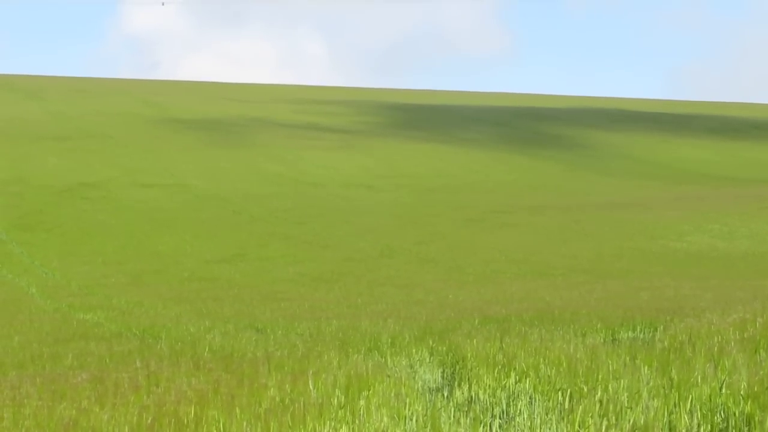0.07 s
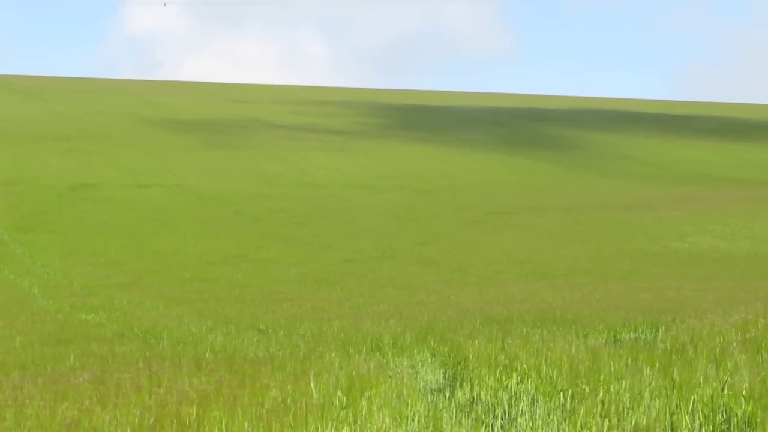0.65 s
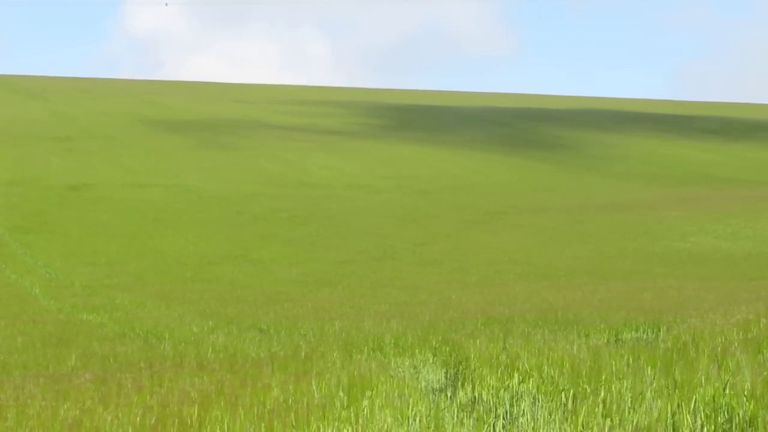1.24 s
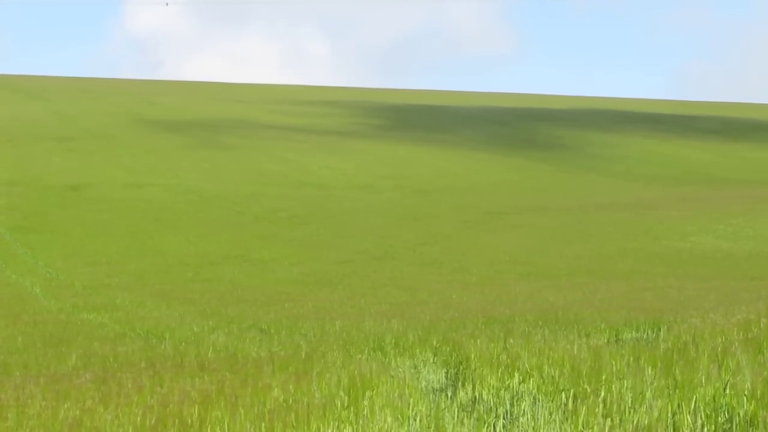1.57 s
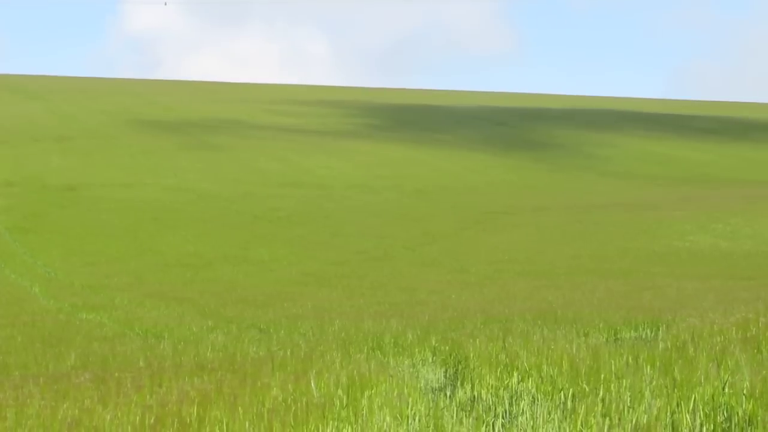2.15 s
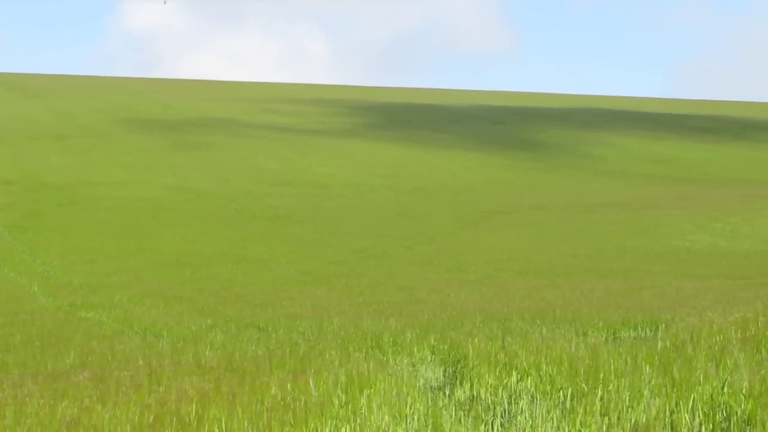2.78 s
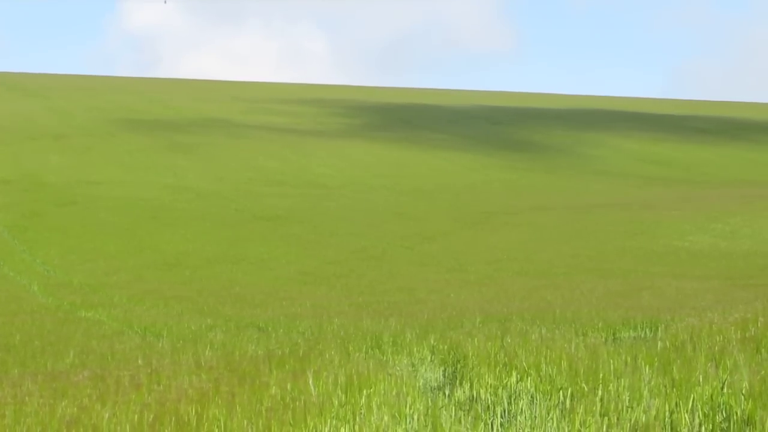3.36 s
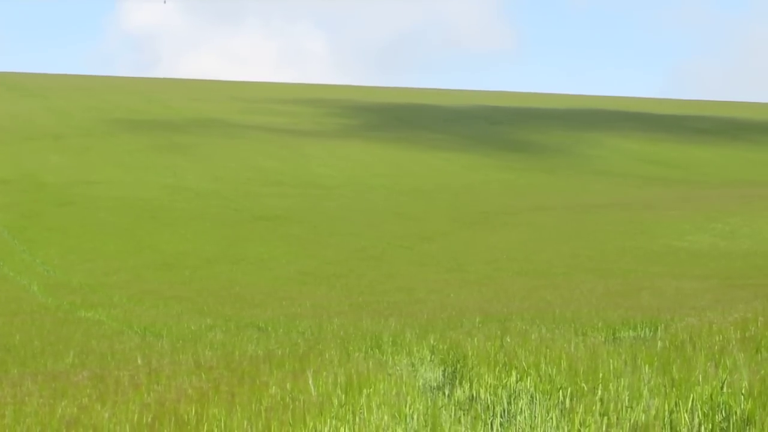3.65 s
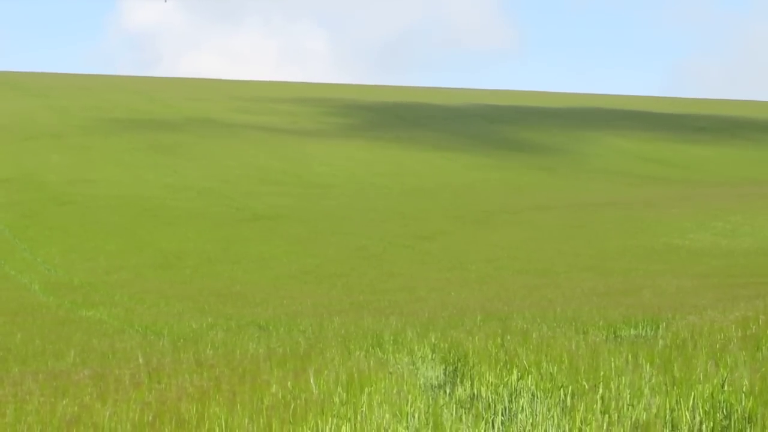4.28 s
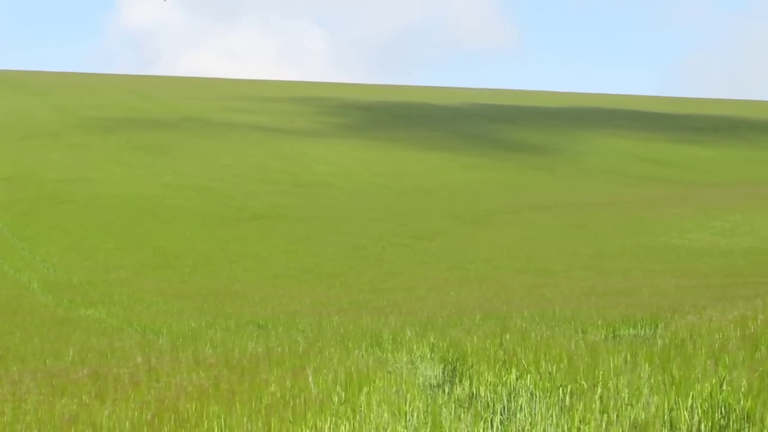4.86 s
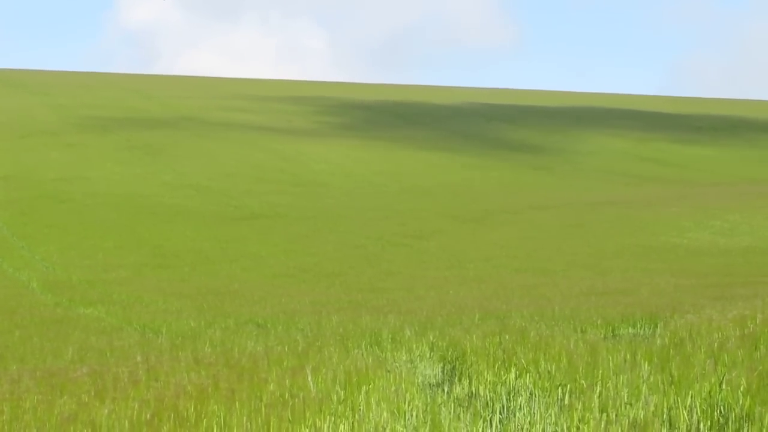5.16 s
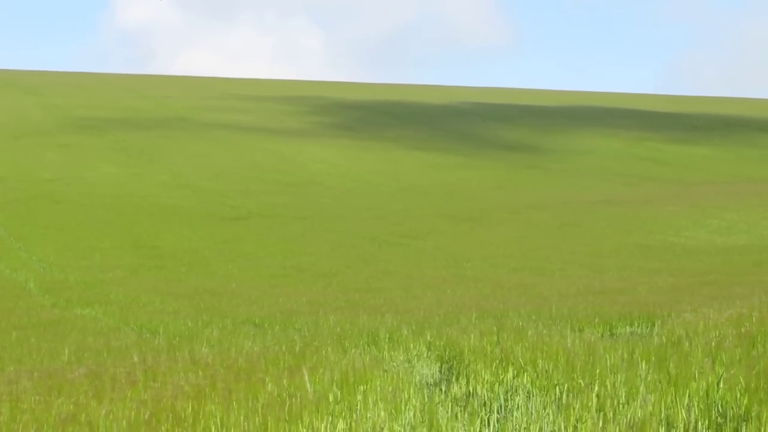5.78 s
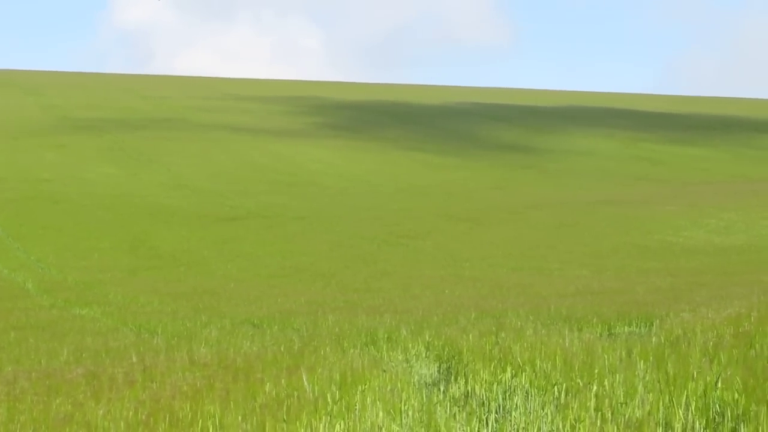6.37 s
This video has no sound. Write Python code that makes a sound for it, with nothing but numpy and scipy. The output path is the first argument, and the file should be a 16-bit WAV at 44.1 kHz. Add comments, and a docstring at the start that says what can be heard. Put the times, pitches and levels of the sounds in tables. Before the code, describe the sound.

Small birds twitter across a field under low wind buffeting that builds toward the end, with one sharp tap on the camera.

```python
"""Gusty wind buffets the two ports (openings) of a microphone, harder towards the end.
Its swirls of air make a low rumble, a ragged spatter and a few sharp slaps. Small birds, near and
far, chirp, twitter and trill in an open field: each note is a whistle with a moving pitch.
Something taps the camera body once and it rings briefly. In the background, puffs of wind rustle
the grass over a soft wash of open air and far traffic."""
import sys
import numpy as np
from scipy import signal
from scipy.fft import rfft, irfft
from scipy.io import wavfile
from scipy.ndimage import uniform_filter1d

SR = 44100
rng = np.random.default_rng(int(sys.argv[2]) if len(sys.argv) > 2 else 0)


def unload_audio(sound):
    """Save the sound as a 16-bit wav file, at the path given as the first command line argument."""
    columns = np.transpose(np.atleast_2d(sound))
    # keep every value between -1 and 1, then stretch to whole-number steps
    steps = np.round(np.clip(columns, -1, 1) * 32767)
    wavfile.write(sys.argv[1], SR, steps.astype(np.int16))


N = 287532
TIME, FREQS = np.arange(N) / SR, np.fft.rfftfreq(N, 1 / SR)

# Levels in the tables are relative: the functions turn them up or down further.
# How strong the wind is at each port. Each row: time in seconds, left in dB, right in dB.
WIND_STRENGTH = [(0, -45.5, -43), (.2, -33, -39.5), (.45, -33, -49), (.57, -48, -53), (.72, -28, -34),
                 (1.38, -24.5, -36), (1.47, -44.5, -47), (1.87, -49, -48), (1.98, -36, -34.5),
                 (2.3, -45, -40), (2.62, -39, -31), (3.1, -40, -31), (3.45, -33, -31), (3.7, -33, -29.5),
                 (4.25, -25, -21), (4.5, -31, -36), (4.69, -19.5, -29), (5.07, -15, -24.5),
                 (5.52, -18, -14.5), (5.82, -17, -27.5), (6.37, -15.5, -29), (6.52, -23, -38)]
# Short gusts (+) and lulls (-) on top of that.
# Each row: peak time in seconds, half width in seconds, left change in dB, right change in dB.
GUSTS = [(.804, .048, 10.5, 8), (3.533, .015, 6, 0), (3.775, .038, 7, 15), (3.884, .027, 10, 0),
         (4.0, .025, -3, -4), (4.24, .033, 6, 4), (4.337, .02, -6.5, -9), (4.562, .033, -2.5, 17.5),
         (5.013, .039, -8, -4.5), (5.167, .023, -4, 12), (5.235, .029, 4.5, -3), (5.382, .019, -10, 5),
         (5.496, .042, 2.5, 3), (5.71, .035, 3.5, 3), (5.982, .015, -7.5, 1), (6.293, .027, -6.5, -2),
         (6.4, .018, 0, 6)]
# The tone of the wind's layers. Each row: frequency in Hz, level in dB.
FIRM_RUMBLE_TONE = [(8, -18), (25, -6), (45, -3.5), (70, 0), (105, -2), (140, -7), (185, -21), (400, -59),
                    (2000, -130)]  # big swirls in a firm gust
LIGHT_RUMBLE_TONE = [(8, -13.5), (25, 2.5), (45, 1.5), (70, -0.5), (105, -13), (160, -25.5), (300, -54),
                     (2000, -130)]  # big swirls in light air
BUFFET_TONE = [(70, -24.5), (110, 0), (150, -1), (210, -3), (300, -12.5), (420, -27.5), (600, -40),
               (1000, -71), (6000, -125)]  # smaller, quicker swirls
SPATTER_TONE = [(150, -18), (330, 7), (480, 1.5), (700, -11), (1000, -19), (1500, -34.5), (2500, -40.5),
                (9000, -96)]  # the rough edge of hard gusts
# The hardest swirls at the left port. Each row: time in seconds, peak in dB, width in seconds.
SLAPS = [(0.762, -9, 0.0025), (0.793, -7, 0.0018), (4.698, -14, 0.00074), (4.887, -15.5, 0.00082),
         (4.935, -7, .0017), (5.217, -6.5, 0.00065), (5.239, -13.5, 0.00052), (5.303, -13, 0.00077),
         (5.437, -16, 0.00073), (5.482, -9, 0.00074), (5.505, -17, .001), (5.552, -16, 0.00075),
         (5.681, -9, 0.00078), (5.703, -3.5, .0011), (5.77, -14, 0.00098), (5.8379, -6, 0.00052),
         (6.018, -10.5, 0.0007), (6.188, -12.5, 0.00093), (6.347, -15, 0.00083)]

# A ground bird's upward flicks. Each row: start in seconds, level in dB.
FLICKS = [(0.1686, -43), (0.367, -41), (0.4788, -43.5), (0.7321, -61), (0.9618, -53.5), (1.1234, -53),
          (1.8438, -61), (2.2379, -60), (3.1909, -59), (3.3605, -60), (4.3259, -59), (4.4966, -59)]
# The nearest bird's hoarse calls. Each row: start in seconds, level in dB, pitch in Hz.
CHIRPS = [(0.4962, -40, 5300), (0.9134, -37, 5460), (1.3339, -38, 5480), (1.816, -48.5, 5250),
          (2.7695, -35, 5600), (3.599, -47, 5300), (5.8793, -38, 5250)]
# Notes that rise and fall. Each row: delay in seconds, length in seconds, level change in dB,
# then the pitch at the start, middle and end as a multiple of the call's pitch.
CHIRP_NOTES = [(0, .0063, 0, .89, 1.04, 1.01), (.012, .0135, -2.5, .87, .99, .95)]  # the two notes of a chirp
SEESAW_LAST_NOTE = [(.003, .028, 3, .975, 1, .905)]  # the note that closes a seesaw
# The singer seesaws between a low and a high note. Each row: start in seconds, number of pairs,
# length of a pair in seconds, level in dB, centre pitch in Hz.
SEESAWS = [(4.5659, 2, .0215, -47.5, 5020), (4.954, 3, .0187, -37.5, 5020)]
# Single sliding whistles. Each row: bird, start in seconds, length in seconds, level in dB,
# first pitch in Hz, last pitch in Hz.
SLIDES = [("singer", .0643, .016, -47, 5300, 4060), ("singer", 1.308, .01, -48, 5700, 4410),
          ("warbler", 2.26, .22, -61, 3480, 3000), ("twitterer", 3.134, .015, -57, 6700, 4900),
          ("warbler", 3.24, .17, -57.5, 4620, 4230), ("singer", 3.785, .043, -47, 5100, 5010),
          ("singer", 4.1513, .007, -48, 5700, 4900), ("singer", 4.2265, .03, -55, 5300, 4080),
          ("warbler", 4.4251, .035, -50, 3760, 3820), ("warbler", 4.7943, .02, -38, 4350, 3900),
          ("near", 4.8266, .0097, -36.5, 4850, 5600), ("warbler", 4.8423, .0097, -42, 4210, 4100),
          ("warbler", 5.3205, .023, -47, 3640, 3690), ("warbler", 5.343, .152, -47, 3950, 3220),
          ("warbler", 5.352, .028, -48, 3750, 3350), ("warbler", 5.3728, .056, -59, 2880, 2700),
          ("warbler", 5.4241, .047, -55, 1910, 1980), ("warbler", 5.535, .048, -53, 3630, 3520),
          ("warbler", 5.6154, .049, -50, 3550, 3100), ("singer", 6.0774, .029, -33.5, 5780, 5150),
          ("warbler", 6.1393, .005, -39, 4400, 4430), ("singer", 6.3826, .019, -40, 5150, 5500),
          ("singer", 6.4053, .008, -35, 5190, 4530), ("singer", 6.4443, .02, -38, 5850, 5240)]
# Quick runs of like notes. Each row: bird, start in seconds, number of notes, spacing in seconds,
# level in dB, pitch in Hz, slide within a note in octaves, climb per note in octaves.
RUNS = [("near", 1.4631, 2, .017, -49.5, 5280, -.22, -.1), ("near", 1.6072, 2, .019, -50, 5400, -.33, -.08),
        ("near", 1.7286, 2, .018, -51, 5400, -.2, -.04),
        ("twitterer", 2.2071, 2, .021, -56, 5750, -.28, .06),
        ("twitterer", 2.4179, 2, .021, -56, 5500, -.22, 0),
        ("twitterer", 2.5787, 2, .021, -55, 5800, -.3, 0),
        ("twitterer", 2.8052, 2, .024, -51, 5800, -.4, 0),
        ("twitterer", 2.895, 6, .0247, -52, 6050, -.45, 0), ("singer", 3.0895, 2, .058, -52, 4900, .07, 0),
        ("singer", 3.2957, 4, .057, -52, 4930, .08, 0), ("warbler", 4.6867, 5, .015, -47, 3670, -.48, 0),
        ("warbler", 4.8589, 4, .0145, -45, 3300, 0, 0), ("warbler", 5.927, 3, .0235, -49.5, 3250, -.3, 0),
        ("singer", 6.044, 2, .009, -34.5, 4950, -.14, .09), ("singer", 6.4165, 3, .01, -35, 5220, .25, .08)]
# Buzzy trills. Each row: start in seconds, length in seconds, level in dB, first pitch in Hz,
# last pitch in Hz, pitch swing in Hz, swings per second, depth of throb from 0 to 1.
TRILLS = [(0.021, 0.052, -56, 4770, 4880, 300, 270, .3), (2.055, .066, -47, 5500, 5300, 250, 420, 0.4),
          (2.127, 0.24, -57, 5320, 5100, 200, 83, .95), (3.304, 0.39, -63.5, 4150, 2910, 170, 22, 0.8),
          (5.069, 0.04, -51.5, 3820, 3860, 350, 135, 0.64), (5.113, .184, -37.5, 5080, 5290, 390, 117, .05),
          (5.71, .135, -52, 4670, 5000, 330, 150, .95), (5.68, .16, -58.5, 3500, 3150, 200, 89, .7),
          (5.998, .2, -50.5, 4130, 3280, 120, 110, .95), (6.18, 0.125, -56, 3330, 2250, 200, 83, 0.5)]

# The camera body's ringing tones. Each row: frequency in Hz, left level in dB, right level in dB,
# seconds to fade by 60 dB.
BODY_RINGS = [(740, -27, -28, 0.022), (980, -29, -42, 0.013), (1550, -53, -53, .011),
              (1900, -17, -30, 0.017), (2530, -13, -21, 0.015), (3004, -9, -33, 0.0052),
              (3750, -33, -19, 0.0065), (4460, -25, -42, 0.014), (5300, -39, -25, .007),
              (7300, -52, -27, 0.0091)]
# Its many weaker rings, blurred into a crack. Each row: frequency in Hz, level in dB.
CRACK_TONE = [(150, -14), (700, 1), (2000, -4), (3500, -13), (7000, -11), (11000, -40)]

# Puffs through the grass. Each row: peak time in seconds, half width in seconds, level in dB.
PUFFS = [(1.83, .13, -62), (3.8, 0.1, -47), (5.15, 0.069, -52), (6.44, 0.097, -49.5)]
# The tone of the background sounds. Each row: frequency in Hz, level in dB.
GRASS_TONE = [(300, -23), (800, 3.5), (1300, 3), (2000, -2), (3000, -4), (5000, -3), (7500, -8),
              (10000, -24.5), (15000, -48)]  # rustling stalks
AIR_TONE = [(30, 4.5), (150, 2.5), (260, -1.5), (400, -11.5), (750, -10.5), (1340, -17.5), (2000, -18.5),
            (3900, -19.5), (5400, -20.5), (7000, -24), (9000, -27.5), (15500, -32.5)]  # the wash of open air and far traffic
RIGHT_HISS_TONE = [(4000, -17), (7500, -7), (11500, -19)]  # extra hiss at the right port
TRAFFIC_TONE = [(100, -25.5), (190, 1.5), (285, 4), (370, -8), (550, -14), (1200, -44.5)]  # the low drone of traffic
# How the background rises and falls. Each row: time in seconds, level in dB.
TRAFFIC_LEVEL = [(0, -66), (.6, -55), (1.3, -60), (1.6, -45), (1.9, -56), (2.3, -45), (2.6, -53),
                 (3.1, -52), (3.6, -66)]  # the drone comes and goes
BACKGROUND_DIP = [(5.2, 0.7), (5.56, -3.8), (6.22, -4.3), (6.34, 0)]  # air, traffic and far birds sink under the hardest wind


def wind():
    """The two ports meet unrelated swirls of air; the left faces the wind and takes its slaps."""
    gust_left, gust_right = sum(np.outer(ports_db, bell(s, width)) for s, width, *ports_db in GUSTS)
    left = port_wind(curve(WIND_STRENGTH, column=1) + gust_left, firm_buffet_db=-30.5, spatter_db=-32.5)
    right = port_wind(curve(WIND_STRENGTH, column=2) + gust_right, firm_buffet_db=-39, spatter_db=-35)
    half = SR // 100
    for s, db, width in SLAPS:
        u = np.arange(-half, half) / SR / width
        suction = (1 - u ** 2) / (1 + u ** 2) ** 2  # a swirl passes: a dip between two soft shoulders
        add(left, s - half / SR, -amp(db) * suction * np.hanning(len(u)))
    return np.array([left, right])


def port_wind(strength_db, firm_buffet_db, spatter_db, firm_wind_db=-22, rumble_limit_db=-9.5):
    """Big swirls rumble at one port, smaller ones buffet it, and spatter grows steeply in hard gusts."""
    rumble_db = strength_db - 10 * np.log10(1 + amp(strength_db - rumble_limit_db) ** 2)
    buffet_db = firm_buffet_db + 2.25 * (strength_db - firm_wind_db)
    firmness = np.clip(1 + (strength_db - firm_wind_db) / 12, 0, 1)  # faster air sheds quicker swirls
    swirls = np.sqrt(firmness) * noise(FIRM_RUMBLE_TONE)
    swirls += np.sqrt(1 - firmness) * noise(LIGHT_RUMBLE_TONE)
    rumble = amp(rumble_db) * steadied(swirls, .065)
    bursts = drift(35)  # buffet and spatter come in the same ragged bursts
    buffet = amp(buffet_db) * steadied(noise(BUFFET_TONE) * amp(4.3 * bursts), .08)
    spatter_gain = amp(spatter_db + 1.39 * (buffet_db + 14))
    spatter = spatter_gain * steadied(noise(SPATTER_TONE) * amp(8.1 * bursts), .067)
    return rumble + buffet + spatter


def birds():
    """Each bird calls from its own direction; the farther ones carry more echo."""
    mix = amp(-2) * place(flicks(), .1, -.000024, echo_db=-7.5)
    near = sing(chirps() + song("near"), hoarse=.2, waver=.018, overtone_db=-2)
    mix += amp(-1) * place(near, 2.5, .00004, echo_db=-16.5)
    singer = sing(seesaws() + song("singer"), hoarse=.027, waver=.0056)
    mix += amp(-5.5) * place(singer, 1.3, .00005, echo_db=-15)
    twitterer = sing(song("twitterer"), hoarse=.03, waver=.0053)
    mix += amp(-3) * place(twitterer, -5.5, -.000011, echo_db=-6)
    warbler = sing(song("warbler"), hoarse=.11, waver=.012)
    mix += amp(-.5) * place(warbler, .94, -.00011, echo_db=-13.5, fade_s=.3)
    return mix + amp(-6.5) * place(trills(), 1.1, .00005, echo_db=-14)


def sing(notes, hoarse, waver, rasp_hz=900, overtone_db=-26):
    """Whistled notes; a second, unsteady vibration in the bird's voice box adds a rasp as each peaks."""
    out, wobble = np.zeros(N), 1 + waver * drift(250)
    flutter = whistle(rasp_hz * (1 + .35 * drift(370)))
    for s, length, db, start_hz, middle_hz, end_hz in notes:
        u = np.linspace(0, 1, max(int(length * SR), 32))  # progress through the note
        span = slice(int(s * SR), int(s * SR) + len(u))
        hz = np.polyval(np.polyfit([0, .5, 1], [start_hz, middle_hz, end_hz], 2), u) * wobble[span]
        swell = abs(np.sin(np.pi * u)) ** .44
        rasp = hoarse * swell ** 2 * flutter[span]
        overtone = amp(overtone_db) * rasp * whistle(hz * 7 / 5)
        add(out, s, amp(db) * swell * ((1 + rasp) * whistle(hz) + overtone))
    return out


def chirps():
    """Lists the notes of the near bird's repeated two-note call."""
    return [note for row in CHIRPS for note in call_notes(CHIRP_NOTES, *row)]


def seesaws(step_octaves=.095, slide_octaves=.19):
    """Lists low rising and high falling notes in turn, then one note to close each phrase."""
    notes = []
    for s, pairs, pair_s, db, hz in SEESAWS:
        for k in range(2 * round(pairs)):
            side = (-1) ** k
            pitch = hz * 2 ** (-side * step_octaves)
            notes.append(glide(s + k * pair_s / 2, .43 * pair_s, db, pitch, side * slide_octaves))
        notes += call_notes(SEESAW_LAST_NOTE, s + round(pairs) * pair_s, db, hz)
    return notes


def song(bird, longest_run_note_s=.0105, slowing=.06, growth_db=.7):
    """Lists one bird's slides, which bend most near the end, and its runs, which slow and swell."""
    notes = [(s, length, db, start_hz, start_hz + .3 * (end_hz - start_hz), end_hz)
             for who, s, length, db, start_hz, end_hz in SLIDES if who == bird]
    for who, s, count, spacing, db, hz, slide, climb in RUNS:
        if who == bird:
            length = min(longest_run_note_s, .68 * spacing)
            for k in range(round(count)):
                start = s + k * spacing * (1 + slowing * (k - 1) / 2)
                notes.append(glide(start, length, db + k * growth_db, hz * 2 ** (k * climb), slide))
    return notes


def flicks(length_s=.0155, low_hz=1830, lift_hz=350, flick_hz=2350):
    """A ground bird's call stays low, then flicks up by over an octave as it fades."""
    out, u = np.zeros(N), np.linspace(0, 1, int(length_s * SR))
    swell = abs(np.sin(np.pi * u ** 1.3)) ** .34
    call = swell * whistle(low_hz + lift_hz * u + flick_hz * u ** 5.3)
    for s, db in FLICKS:
        add(out, s, amp(db) * call)
    return out


def trills(rough_db=2.4):
    """The pitch swings quickly about a sliding centre, and the loudness throbs with it."""
    out, wobble, tremor = np.zeros(N), drift(41), drift(140)
    for s, length, db, start_hz, end_hz, swing_hz, rate, throb in TRILLS:
        u = np.linspace(0, 1, int(length * SR))
        span = slice(int(s * SR), int(s * SR) + len(u))
        phase = 2 * np.pi * np.cumsum(rate * (1 + .027 * wobble[span])) / SR
        centre_hz = start_hz + (end_hz - start_hz) * u ** 1.5
        hz = centre_hz + swing_hz * (np.sin(phase) + .2 * np.sin(2 * phase)) + 45 * tremor[span]
        pulse = unit(abs(1 + np.clip(throb, 0, 1) * np.sin(phase + 1.3)) ** 1.1)
        swell = abs(np.sin(np.pi * u)) ** .3
        add(out, s, amp(db + rough_db * tremor[span]) * pulse * swell * whistle(hz))
    return out


def camera_tap(at_s=2.4637, push_db=-15, push_s=.0001, crack_db=-25, crack_fade_s=.019, cutoff_hz=6500):
    """One hard tap pushes the left port and rings the camera body briefly."""
    t, out = np.arange(SR // 10) / SR, np.zeros((2, N))
    left_s = at_s + .0001
    add(out[0], left_s, -amp(push_db) * t / push_s * np.exp(1 - t / push_s))
    for port, side_db in zip(out, (0, -7)):
        add(port, at_s, noise(CRACK_TONE)[:len(t)] * amp(crack_db + side_db - 60 * t / crack_fade_s))
    for k, (hz, left_db, right_db, fade_s) in enumerate(BODY_RINGS):
        ring = amp(-60 * t / fade_s) * np.sin(2 * np.pi * hz * t)
        add(out[0], left_s, -amp(left_db) * ring)
        add(out[1], at_s, (-1) ** k * amp(right_db) * ring)  # every other ring moves the opposite way
    return signal.sosfilt(signal.butter(4, cutoff_hz, fs=SR, output="sos"), out)


def grass():
    """Puffs of wind swell through the stalks and rustle them, a little louder on the right."""
    swell = sum(amp(db) * bell(s, width) for s, width, db in PUFFS)
    return np.array([noise(GRASS_TONE) * amp(side_db + 1.9 * drift(70)) for side_db in (-1, 1)]) * swell


def far_birds(count=60, level_db=-66):
    """Random scraps of song from birds at the edge of hearing."""
    when, long, loud, pitch, bend = rng.random((count, 5)).T
    hz, fall = 3400 + 2600 * np.sqrt(pitch), .16 * (bend - .3)
    starts, lengths, levels = when * (TIME[-1] - .1), .008 + .035 * long ** 3, level_db + 6 * (loud - .5)
    notes = np.transpose([starts, lengths, levels, hz * (1 + fall), hz, hz * (1 - fall)])
    return place(sing(notes, hoarse=.05, waver=.017), -1, 0, echo_db=-5)


def air_and_traffic(wash_db=-50, hiss_db=-68):
    """The soft wash of the open field with a far drone of traffic."""
    left = amp(wash_db) * noise(AIR_TONE) * amp(.43 * drift(8))
    right = amp(wash_db - .63) * noise(AIR_TONE) * amp(.43 * drift(15))
    right += amp(hiss_db) * noise(RIGHT_HISS_TONE)
    drone = np.array([noise(TRAFFIC_TONE), noise(TRAFFIC_TONE)]) * amp(curve(TRAFFIC_LEVEL))
    return np.array([left, right]) + drone


def place(x, left_louder_db, right_delay_s, echo_db, fade_s=.23):
    """Gives a sound a direction and adds the faint echo that the field scatters back."""
    t = np.arange(SR // 2) / SR
    delayed = irfft(rfft(x) * np.exp(-2j * np.pi * FREQS * right_delay_s), N)
    direct = np.array([x * amp(left_louder_db / 2), delayed * amp(-left_louder_db / 2)])
    tails = [unit(rng.standard_normal(len(t)) * amp(-60 * t / fade_s)) / np.sqrt(len(t)) for _ in "LR"]
    echo = np.array([signal.fftconvolve(x, tail)[:N] for tail in tails])
    return direct + amp(echo_db) * echo


def glide(s, length, db, hz, octaves):
    """Describes one note that slides evenly through hz."""
    return s, length, db, hz * 2 ** (-octaves / 2), hz, hz * 2 ** (octaves / 2)


def call_notes(shape, s, db, hz):
    """Lists the notes of a set call at a given time, level and pitch."""
    return [(s + delay, length, db + step_db, hz * start, hz * middle, hz * end)
            for delay, length, step_db, start, middle, end in shape]


def whistle(hz):
    """A pure tone that follows a pitch curve."""
    return np.sqrt(2) * np.sin(2 * np.pi * np.cumsum(hz) / SR)


def noise(tone):
    """Noise coloured by a table of frequencies and levels."""
    hz, db = np.transpose(tone)
    return shaped(amp(np.interp(np.log(FREQS + 1), np.log(hz), db)))


def drift(hz):
    """A random wobble, up to about hz times a second."""
    return shaped(np.exp(-(FREQS / hz) ** 2))


def shaped(gain):
    """Noise of average size 1, shaped by a gain for each frequency."""
    spectrum = rng.standard_normal(len(FREQS)) + 1j * rng.standard_normal(len(FREQS))
    return unit(irfft(gain * spectrum, N))


def steadied(x, span_s):
    """Evens out swells longer than span_s seconds."""
    power = abs(uniform_filter1d(x ** 2, max(int(span_s * SR), 2)))
    return x / np.sqrt(power + .0067)


def bell(s, width):
    """A smooth swell of height 1 around time s."""
    return np.exp(-.5 * ((TIME - s) / width) ** 2)


def curve(rows, column=1):
    """Joins the points of a timed table with straight lines."""
    rows = np.asarray(rows)
    return np.interp(TIME, rows[:, 0], rows[:, column])


def amp(db):
    """Turns decibels into a gain."""
    return 10 ** (np.asarray(db) / 20)


def unit(x):
    """Scales a signal to an average size (rms) of 1."""
    return x / np.sqrt(np.mean(x ** 2) + 1e-20)


def add(mix, s, sound):
    """Mixes a sound in at s seconds."""
    part = mix[max(round(s * SR), 0):][:len(sound)]
    part += sound[:len(part)]


def scene():
    """Wind on the microphone and one tap, in front of the birds and the field."""
    dip = amp(curve(BACKGROUND_DIP))
    field = birds() + (far_birds() + air_and_traffic()) * dip + grass()
    return wind() + camera_tap() + field


def record(dry):
    """Rounds off the strongest buffets near full scale, then cuts the treble above 15800 Hz."""
    rounded = dry / (1 + dry ** 4) ** (1 / 4)
    treble_cut = signal.firwin(511, 15800, window=("kaiser", 9), fs=SR)
    return signal.oaconvolve(rounded, treble_cut[None], "same")


dry = scene()
out = record(dry)
unload_audio(out)
```